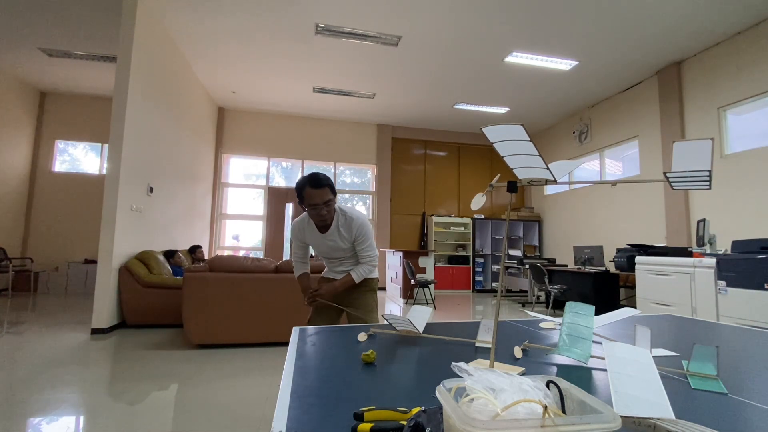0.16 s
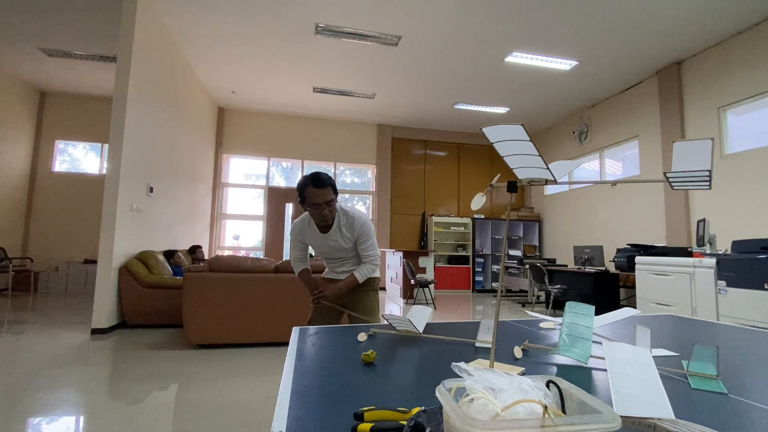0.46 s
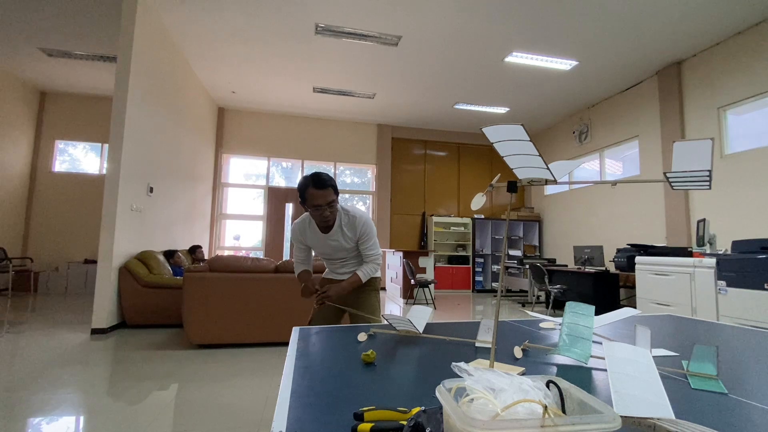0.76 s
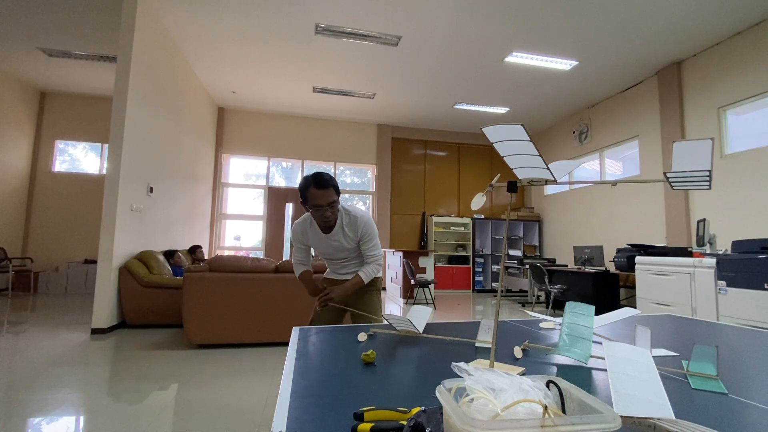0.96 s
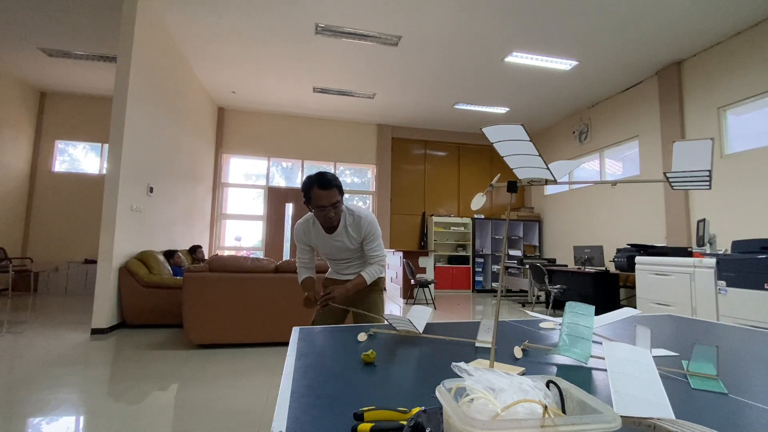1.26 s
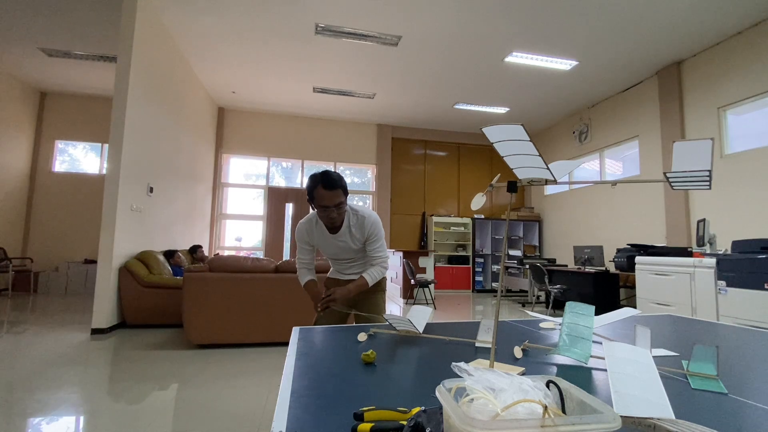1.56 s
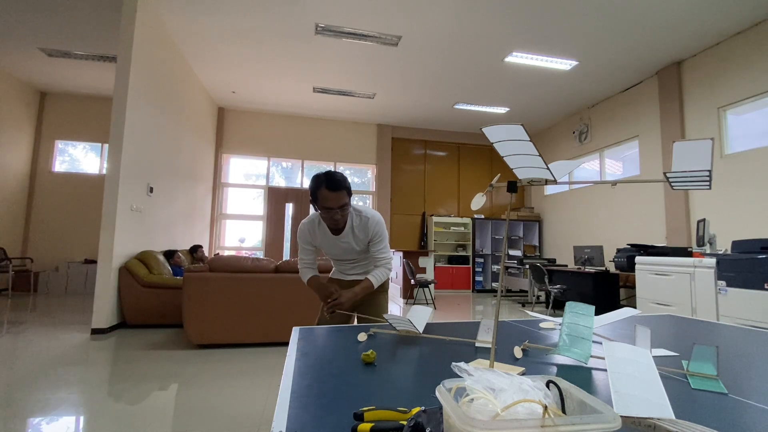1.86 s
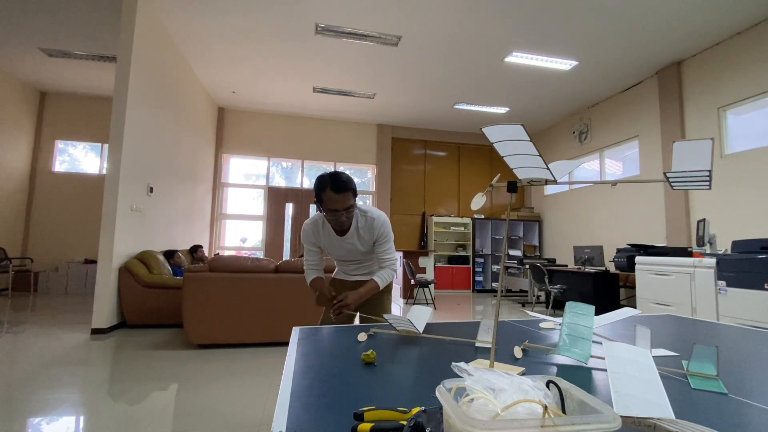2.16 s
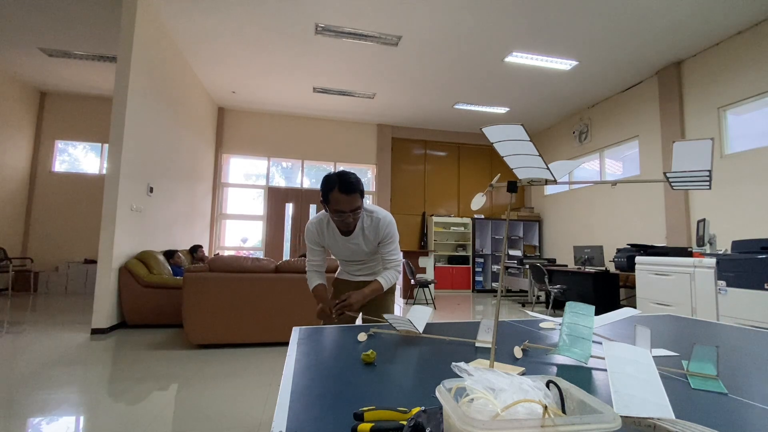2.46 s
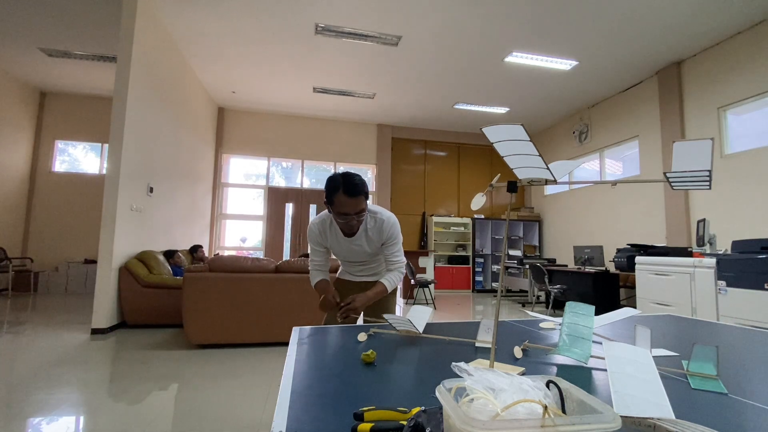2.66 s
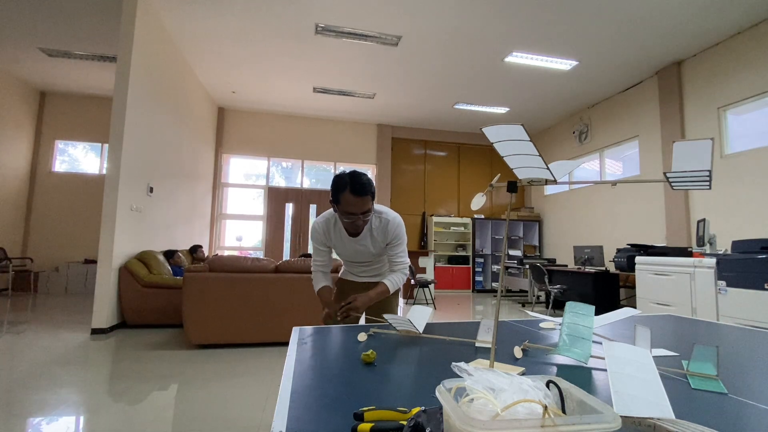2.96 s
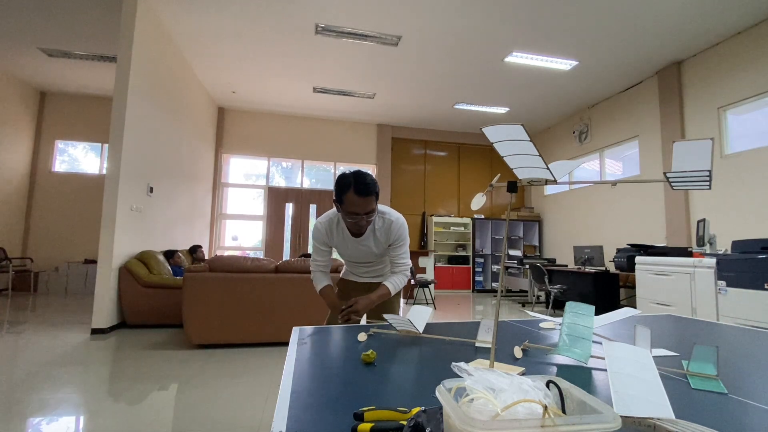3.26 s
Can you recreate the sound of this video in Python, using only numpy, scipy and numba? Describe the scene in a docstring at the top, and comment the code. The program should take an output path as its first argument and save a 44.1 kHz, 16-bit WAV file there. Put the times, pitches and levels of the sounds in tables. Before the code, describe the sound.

A hand-cranked plastic gear winder whirs without pause, swelling slightly about four times a second, with brief bright rasps; a hard-floored room adds short reverberation and faint low rumble, microphone a few metres away.

```python
"""Hand winder in a tiled room

A geared hand winder whirs: dense ticks of its gear teeth ring the plastic case, heard as filtered clicks.
Each push on the crank swells the whir, and a steady rattle of sparser ticks has brief bright rasps.
The room smears it all with noise tails, over a low noise rumble and a wavering sine hum.
Level and phase offsets between left and right, changing with frequency, shape the stereo width.
"""
import sys
import numpy as np
from scipy import signal
from scipy.fft import rfft, irfft, next_fast_len
from scipy.io import wavfile
from scipy.ndimage import uniform_filter1d
from numba import njit

SR = 44100
rng = np.random.default_rng(int(sys.argv[2]) if len(sys.argv) > 2 else 0)


def dump_mix(stems):
    """Bounce the given channels to the path in sys.argv[1] as a 16-bit WAV at rate SR."""
    frames = np.atleast_2d(stems).T  # one column per channel
    limited = np.clip(frames, -1, 1)  # hard clip at full scale
    pcm = np.round(limited * 32767).astype(np.int16)
    wavfile.write(sys.argv[1], SR, pcm)


N = 149940  # length in samples

# Crank pushes: time of the peak t/s, swell of the whir level/dB
CRANK_PUSHES = [(.19, 2.5), (.42, 1.5), (.64, 2), (.88, 3.5), (1.10, 1.5), (1.33, 1.5), (1.56, 1.5),
                (1.80, 1), (2.03, 1), (2.27, 2), (2.53, 2), (2.79, 1.5), (2.97, 2), (3.26, 4.5)]
# Steady effort of the hand: t/s, whir level/dB before the pushes and wobbles
HAND_EFFORT = [(0, -30.5), (.5, -30), (.8, -30.5), (1.05, -30), (1.25, -31), (1.45, -30.5), (1.62, -29.5),
               (1.75, -29), (2.1, -32), (2.4, -32), (2.9, -32.5), (3.4, -32)]
# Resonances of the plastic case: centre f/Hz, nominal width f/Hz, level/dB at the centre before changes
CASE_RESONANCES = [(1496, 400, -5), (1670, 170, -0.5), (1900, 330, -8), (2331, 210, 2), (2611, 295, -6.5),
                   (2940, 320, -6), (3452, 560, -6), (4000, 560, -10), (4620, 750, -7), (5127, 520, -7.5),
                   (5890, 1230, -13.5), (7280, 910, -12), (8500, 1170, -18), (9000, 1060, -18.5),
                   (10770, 2400, -23.5), (13500, 1700, -26.5), (15300, 2400, -37)]
# Irregular flutter of the main resonance: t/s, pitch f/Hz relative to MAIN_REST_HZ, added level/dB
MAIN_FLUTTER = [(0, 2450, -1.5), (.06, 2320, 0), (.14, 2340, -3.5), (.21, 2350, 0), (.26, 2300, -0.5),
                (.38, 2350, 1.5), (.47, 2310, -2.5), (.55, 2310, 0.5), (.63, 2300, -0.5), (.69, 2300, 0),
                (.76, 2290, 2), (.88, 2350, -1), (.94, 2290, 0), (.99, 2430, 4), (1.03, 2320, -4),
                (1.07, 2320, 1), (1.17, 2330, -1.5), (1.24, 2350, 2), (1.31, 2360, 1.5), (1.39, 2430, 0.5),
                (1.425, 2300, 1), (1.46, 2400, 4), (1.53, 2320, 0), (1.64, 2330, -2), (1.74, 2320, 2.5),
                (1.87, 2280, -0.8), (1.98, 2270, 2.5), (2.08, 2270, 1.5), (2.17, 2300, 4), (2.25, 2320, 5),
                (2.36, 2270, 5), (2.45, 2260, 4.5), (2.52, 2330, 2), (2.58, 2240, 3), (2.72, 2270, 3.5),
                (2.82, 2260, 1.5), (2.92, 2280, 2.5), (3.07, 2320, 0.5), (3.16, 2240, 3.5),
                (3.27, 2310, -0.5), (3.4, 2280, 2.5)]
# Coming and going of other resonances: t/s, added level/dB below the main one, added level/dB above it
BODY_SWELLS = [(0, .3, -.7), (.17, 0.5, 0.1), (.3, -1.1, 0.4), (.52, 1, -.7), (.7, 0, 1.2), (.87, -1, -0.3),
               (1.02, 0.5, 0), (1.2, 0.2, 1.3), (1.42, -.3, 1.2), (1.55, -1.7, 0.2), (1.7, 0.5, 0.9),
               (1.83, 2, 0.5), (1.92, 0.5, 1.5), (2.1, 1, 0.5), (2.27, 1.5, 2.7), (2.42, 2.2, 3),
               (2.6, 2.3, 1.8), (2.77, 0.7, 2.5), (2.87, 1, 1.5), (3.05, 2, 2.7), (3.22, -0.5, -1.8),
               (3.4, 1.5, 2.5)]
# Steady rattle between the rasps: t/s, level/dB of its part above RATTLE_BAND_HZ
STEADY_RATTLE = [(0, -55), (1, -53), (1.4, -50), (1.9, -48.5), (2.2, -49.5), (2.9, -49), (3.4, -50.5)]
# Brief bright rasps of the gears: time of the peak t/s, time for power to fall to 1/e t/s,
# level/dB of the part above RATTLE_BAND_HZ
GEAR_RASPS = [(0.161, 0.014, -44.5), (0.19, .012, -46), (0.395, 0.021, -47), (0.61, 0.013, -47),
              (0.647, 0.04, -49.5), (0.852, 0.016, -46), (.885, 0.014, -58), (1.093, 0.011, -46),
              (1.103, 0.01, -49), (1.228, 0.012, -49), (1.302, 0.0089, -47), (1.34, 0.0078, -44.5),
              (1.542, 0.013, -42.5), (1.685, .008, -44.5), (1.78, 0.015, -41.5), (1.836, 0.015, -40.5),
              (1.975, .03, -52), (2.035, 0.014, -42), (2.157, .015, -47), (2.273, 0.036, -45),
              (2.394, 0.017, -46.5), (2.515, 0.031, -45.5), (2.648, 0.0062, -44), (2.735, 0.011, -46),
              (2.788, 0.017, -43), (2.899, 0.015, -44), (2.997, .018, -46.5), (3.122, 0.0072, -43.5),
              (3.18, 0.0092, -47), (3.257, .02, -48), (3.36, .012, -45)]
# Balance between the two sides: f/Hz, left over right level/dB, direct share of the power (0-1)
STEREO_BALANCE = [(60, 2.1, .9), (724, -4.5, 0.01), (1450, 3, 0.16), (2260, -0.5, 0.8), (2780, 2.5, 0.55),
                  (5300, 5, 0.34), (6800, 5.5, 0.16), (8200, 3, 0.06), (8800, 0, 0.33), (9900, -0.5, 1),
                  (16200, 0.5, 0.86)]
# Phase offset between left and right, shaping the stereo width of the direct sound: f/Hz, phase/rad
STEREO_PHASE = [(0, 0), (800, .4), (1600, 1.1), (3000, 1.8), (5000, 2.4), (6500, 3.1), (9200, 3.1),
                (10400, 0), (11700, 0), (12500, -3.14), (13700, -3.14), (14700, -6.28)]
# Raw colour of the room rumble, before more filtering and scaling: f/Hz, relative level/dB
RUMBLE_COLOUR = [(16, -44), (28, -18), (38, -10), (49, -6), (65, -8), (91, -3.5), (145, -6), (326, -4.5),
                 (658, -9.5), (1000, -3.5), (1300, -5.5), (2200, -120)]
# Change of the deepest rumble: t/s, added level/dB
DEEP_SWELL = [(0, 0), (.7, -0.5), (1.4, 1), (2, 1.5), (2.6, 0), (3.4, 0)]
# Hum, before it is leaned to the left: t/s, level/dB
HUM_LEVEL = [(0, -63), (.2, -63), (.3, -55), (.56, -54.5), (.63, -61), (.8, -52.5), (1.02, -50.5),
             (1.3, -57), (1.4, -70), (1.9, -66), (2.08, -54), (2.2, -62), (2.5, -59), (2.7, -48.5),
             (2.81, -61), (3.03, -49.5), (3.22, -66), (3.4, -65)]

RISE_S, FALL_S = 0.063, 0.027  # bell-curve spread of a push before and after its peak
TEETH_PER_S, TEETH_SCATTER_DB, FLUTTER_DB = 4000, 1.75, 0.03  # whir ticks
RATTLE_PER_S, RATTLE_SCATTER_DB, RATTLE_FLUTTER_DB = 2000, 3, 0.22
RATTLE_HZ, RATTLE_BAND_HZ = 6800, 8500  # low cut of the rattle; band where its level is set
JUDDER_DB, WOBBLE_DB, WHIR_TOP_HZ = 0.65, 0.06, 8600
OWN_SHARE = 0.62  # share of each resonance's drive power that is its own chatter
MAIN_REST_HZ, LOW_EDGE_HZ = 2350, 1235
WIDEN = 1.62  # each of two filters in a row is this much wider than the nominal width
WANDER = 0.0086  # typical share of pitch slip; the main resonance slips half as much
FLECK_DB = 1.3  # quick flicker of the main resonance
ROOM_T60_S, ROOM_GAP_S = .32, .006  # time to fade by 60 dB; silence before the tail
CROSSFADE_S = .025  # time for one random noise tail to crossfade into the next
RUMBLE_DB, RUMBLE_ALIKE_HZ, DEEP_HZ = -46.5, 300, 260
RUMBLE_LEFT_DB = 2  # left gains this over right per octave above 300 Hz
HUM_HZ, HUM_WAVER_HZ, HUM_LEFT_DB = 66.2, 1.4, 4
TOP_HZ = 15600
HALVES = np.array([[.5], [-.5]])  # splits a left-over-right difference between the two sides


def undb(db):
    """Turn decibels into an amplitude factor."""
    return 10 ** (np.asarray(db) / 20)


def unit(x):
    """Scale to rms 1."""
    return x / np.sqrt(np.mean(x ** 2))


def curve(table, at, column=1):
    """Read one column of a table, with straight lines between its rows."""
    rows = np.array(table)
    return np.interp(at, rows[:, 0], rows[:, column])


def walk(rate):
    """Random levels held 1 / rate s and smoothed twice; mean 0, spread 1."""
    hold = int(SR / rate)
    steps = np.repeat(rng.standard_normal(N // hold + 1), hold)
    smooth = uniform_filter1d(uniform_filter1d(steps, hold), hold)[:N]
    return unit(smooth - smooth.mean())


def filtered(x, order, hz, kind="low"):
    """Cut what lies above (low) or below (high) an edge frequency."""
    return signal.sosfilt(signal.butter(order, hz, kind, fs=SR, output="sos"), x)


def clicks(rate, scatter_db):
    """Randomly timed ticks of either sign, a few much stronger than the rest."""
    timing, sign, strength = rng.random((3, N))
    ticks = (timing < rate / SR) * np.sign(sign - .5)
    return unit(ticks * undb(-scatter_db * np.log(1 - strength)))


@njit
def resonance(x, hz, width):
    """Ring like a springy part: a band-pass with a moving centre, gain 1 there."""
    y, band, low = np.empty(len(x)), 0., 0.
    for i in range(len(x)):
        g, damping = np.tan(np.pi * hz[i] / SR), width / hz[i]
        v = (band + g * (x[i] - low)) / (1 + g * (g + damping))
        band, low, y[i] = 2 * v - band, low + 2 * g * v, damping * v
    return y


def housing(t, rate, scatter_db, flutter_db):
    """Shared and separate tooth ticks ring the resonances of the plastic case; the main one flutters."""
    out, common = 0, clicks(rate, scatter_db)
    for k, (hz, width, db) in enumerate(CASE_RESONANCES):
        drive = np.sqrt(1 - OWN_SHARE) * common + np.sqrt(OWN_SHARE) * clicks(rate, scatter_db)
        main = 2050 < hz < 2600
        if main:
            centre = curve(MAIN_FLUTTER, t) * hz / MAIN_REST_HZ
            swell = curve(MAIN_FLUTTER, t, column=2)
        else:
            centre = np.full(N, 1. * hz)
            # resonances above 5600 Hz get no level swells
            swell = curve(BODY_SWELLS, t, column=2 if hz > 2600 else 1) * (hz < 5600)
        centre = centre * (1 + WANDER * (1 - main / 2) * walk(24.98))
        gain = undb(db + flutter_db * walk(60) + main * FLECK_DB * walk(110) + swell)
        ring = resonance(drive, centre, WIDEN * width)
        ring = resonance(ring, centre, WIDEN * width)
        out = out + (-1) ** k * ring * gain  # neighbours have opposite sign
    return filtered(out, 2, LOW_EDGE_HZ, "high")


def gear_whir(t):
    """Dense tooth chatter in the case judders and swells with each push."""
    swell = 0
    for peak, db in CRANK_PUSHES:
        spread = np.where(t < peak, RISE_S, FALL_S)
        swell = swell + db * np.exp(-.5 * ((t - peak) / spread) ** 2)
    whir = housing(t, TEETH_PER_S, TEETH_SCATTER_DB, FLUTTER_DB)
    whir = unit(filtered(whir, 2, WHIR_TOP_HZ))
    wobble = JUDDER_DB * walk(40.05) + WOBBLE_DB * walk(34.14)
    return whir * undb(curve(HAND_EFFORT, t) + swell + wobble)


def gear_rattle(t):
    """Sparser, more uneven ticks ring the case; short bursts of power make the bright rasps."""
    power = undb(2 * curve(STEADY_RATTLE, t))  # doubled decibels give power
    for peak, fade, db in GEAR_RASPS:
        power = power + undb(2 * db) * np.exp(-((t - peak) / fade) ** 2)
    rattle = housing(t, RATTLE_PER_S, RATTLE_SCATTER_DB, RATTLE_FLUTTER_DB)
    rattle = filtered(rattle, 2, RATTLE_HZ, "high")
    top = filtered(rattle, 4, RATTLE_BAND_HZ, "high")
    return rattle / np.std(top) * np.sqrt(power)


def winder(t):
    """The gears give a whir and a rattle, added together."""
    return gear_whir(t) + gear_rattle(t)


def heard(x, count=24):
    """Direct sound gets a left-right phase offset; each side adds its own room tails that take turns."""
    n = next_fast_len(N + SR)
    f, t = np.arange(n // 2 + 1) * SR / n, np.arange(SR) / SR
    # the whir was already running: echoes wrap from the end round to the start
    run = np.concatenate([x, np.zeros(n - N - SR // 2), x[:SR // 2]])
    turn, wet = np.arange(n) / SR / CROSSFADE_S, 0
    for k in range(count):
        fade = np.exp(-np.log(1000) * t / ROOM_T60_S) * (t > ROOM_GAP_S)
        tail = rng.standard_normal((2, SR)) * fade
        tail /= np.sqrt(np.sum(tail ** 2, axis=1, keepdims=True))
        # each tail fades in and out around its own turn
        distance = np.abs((turn - k + count / 2) % count - count / 2)
        portion = run * np.cos(np.pi / 2 * np.minimum(distance, 1))
        wet = wet + rfft(portion) * rfft(tail, n)
    share = curve(STEREO_BALANCE, f, column=2)
    direct = rfft(run) * np.exp(1j * HALVES * curve(STEREO_PHASE, f))
    both = np.sqrt(share) * direct + np.sqrt(1 - share) * wet
    return irfft(both * undb(HALVES * curve(STEREO_BALANCE, f)), n)[:, :N]


def room_rumble(t):
    """Shaped noise, nearly alike on both sides in the bass; its deepest part rises and falls."""
    f = np.maximum(np.arange(N // 2 + 1) * SR / N, 1)
    rows = np.array(RUMBLE_COLOUR)
    colour = undb(np.interp(np.log(f), np.log(rows[:, 0]), rows[:, 1]))
    colour *= np.minimum(f / 36, 1) ** 3.5 / (1 + (f / 1300) ** 4)
    alike = .95 / (1 + (f / RUMBLE_ALIKE_HZ) ** 2.9)
    mid, side = rfft(rng.standard_normal((2, N)))
    rumble = colour * (np.sqrt(1 + alike) * mid + 2 * HALVES * np.sqrt(1 - alike) * side)
    rumble = rumble * undb(np.maximum(np.log2(f / 300), 0) * RUMBLE_LEFT_DB * HALVES)
    deep = irfft(rumble / (1 + (f / DEEP_HZ) ** 4), N)
    rumble = irfft(rumble, N) + deep * (undb(curve(DEEP_SWELL, t)) - 1)
    return unit(rumble) * undb(RUMBLE_DB)


def room_hum(t):
    """A low sine tone wavers in pitch and level, stronger on the left."""
    pitch = HUM_HZ + HUM_WAVER_HZ * walk(5.25)
    hum = np.sqrt(2) * np.sin(2 * np.pi * np.cumsum(pitch) / SR)
    return hum * undb(curve(HUM_LEVEL, t) + HUM_LEFT_DB * HALVES)


def scene():
    """Winder through the room, over the room's own rumble and hum."""
    t = np.arange(N) / SR
    return heard(winder(t)) + room_rumble(t) + room_hum(t)


def record(dry):
    """The recorder cuts the top with a steep low-pass filter."""
    return signal.sosfilt(signal.ellip(10, .2, 80, TOP_HZ, fs=SR, output="sos"), dry)


dry = scene()
out = record(dry)
dump_mix(out)
```